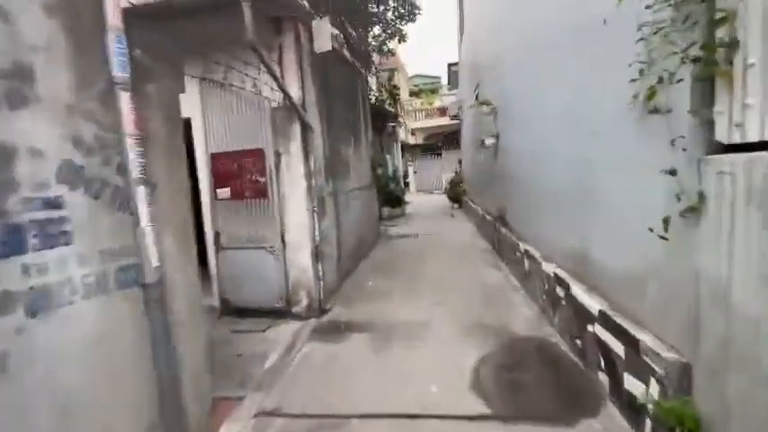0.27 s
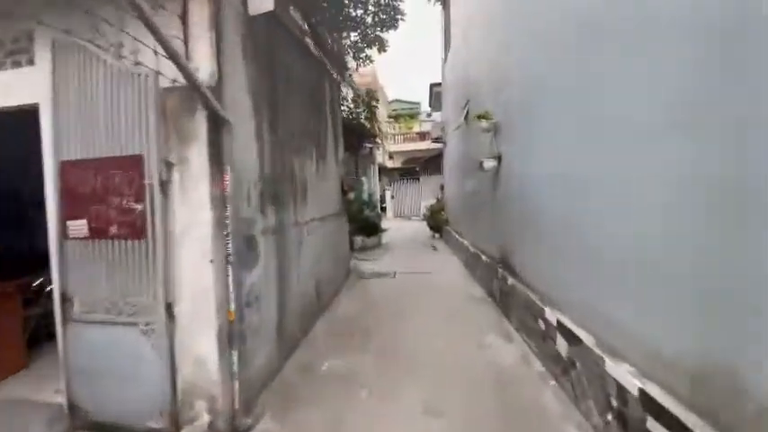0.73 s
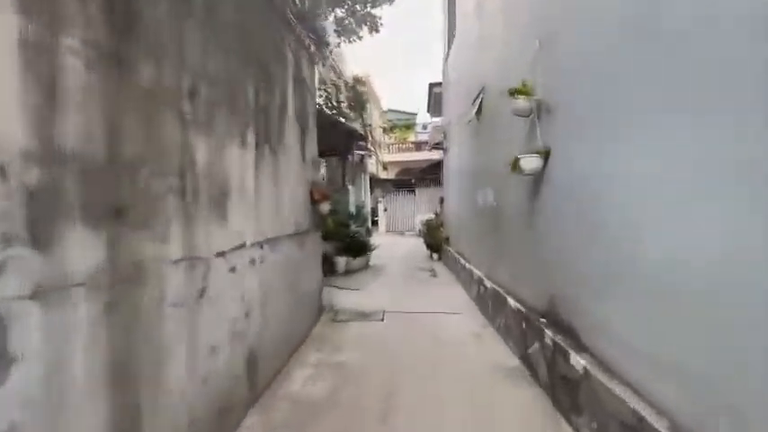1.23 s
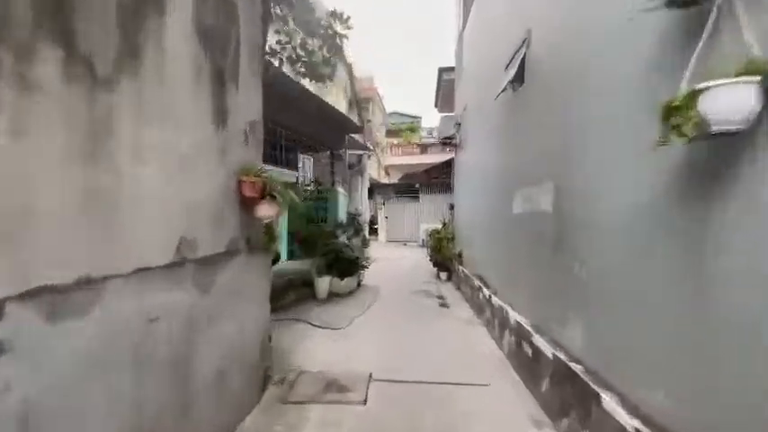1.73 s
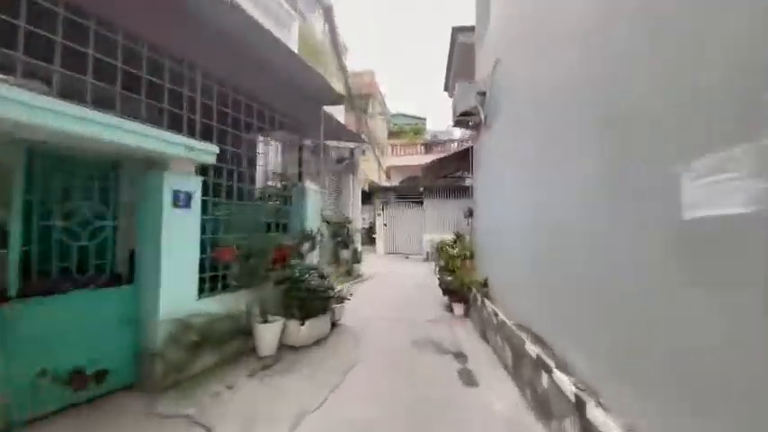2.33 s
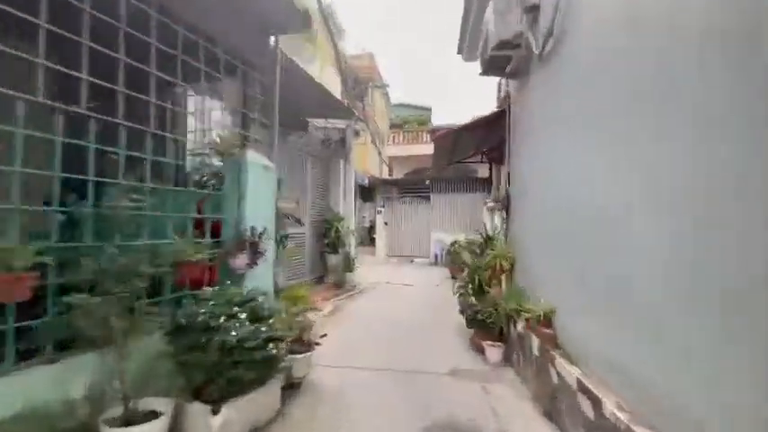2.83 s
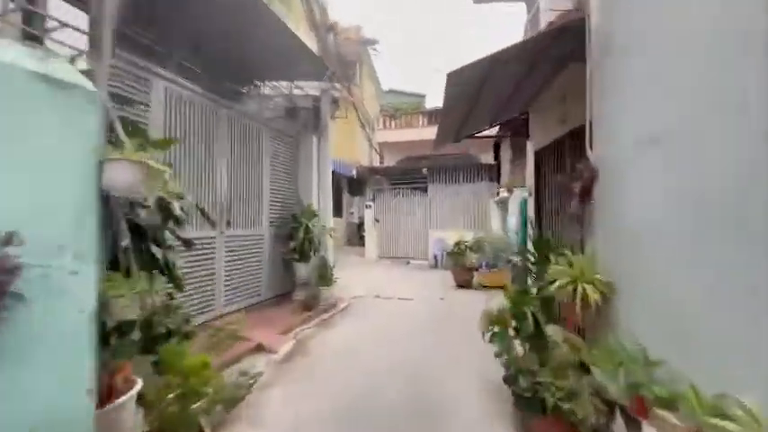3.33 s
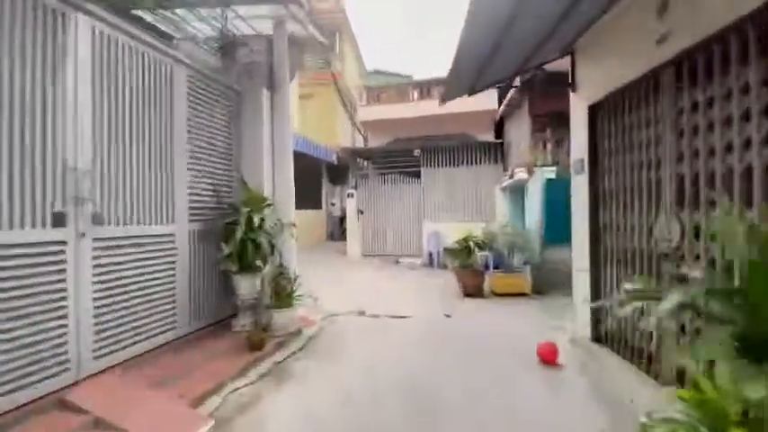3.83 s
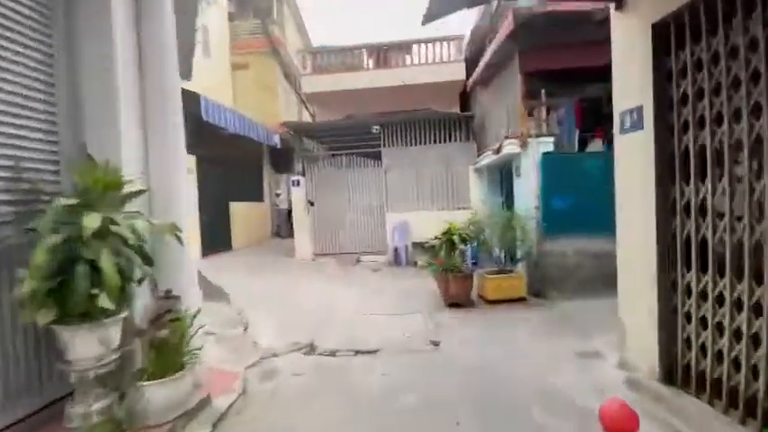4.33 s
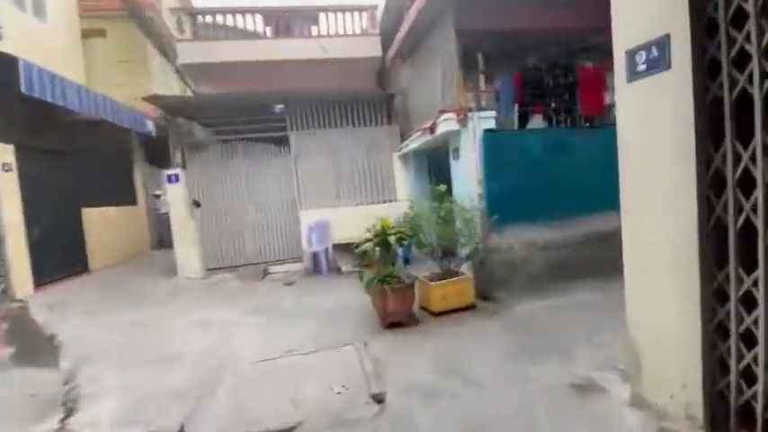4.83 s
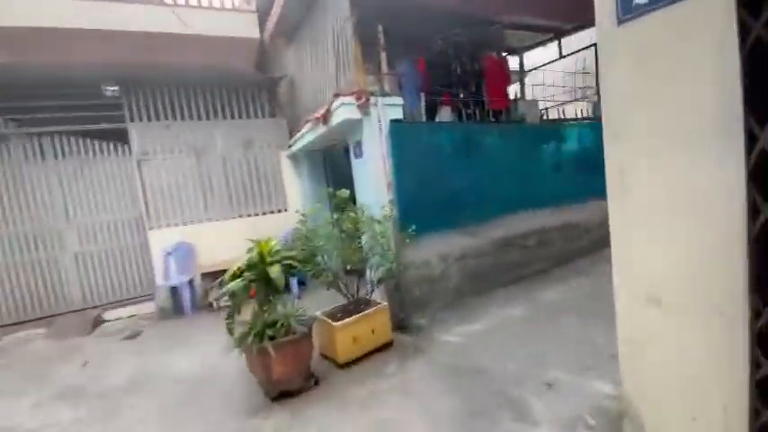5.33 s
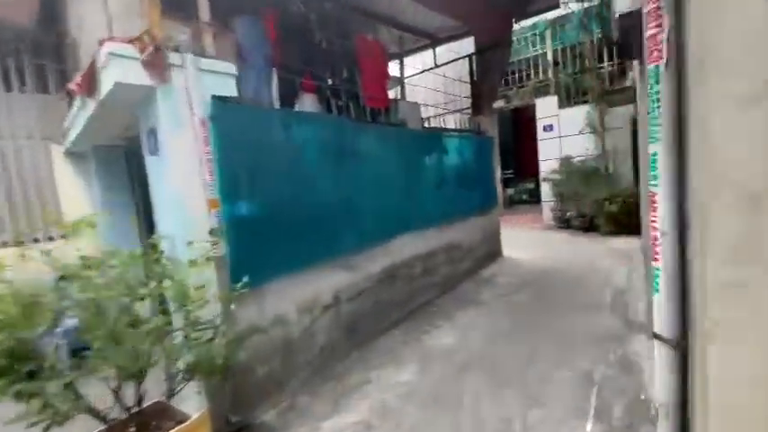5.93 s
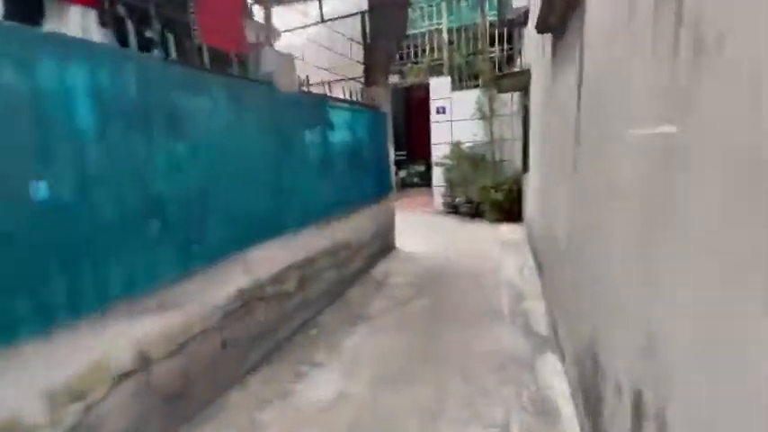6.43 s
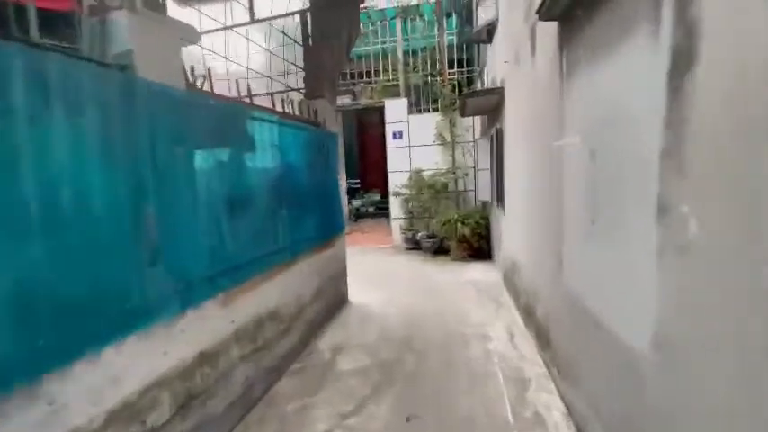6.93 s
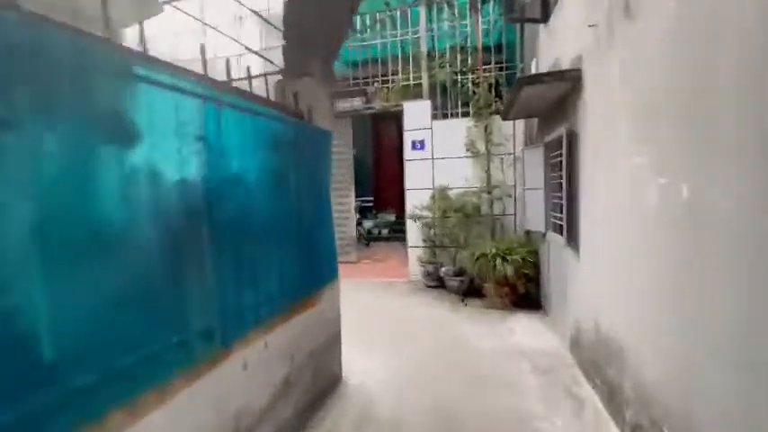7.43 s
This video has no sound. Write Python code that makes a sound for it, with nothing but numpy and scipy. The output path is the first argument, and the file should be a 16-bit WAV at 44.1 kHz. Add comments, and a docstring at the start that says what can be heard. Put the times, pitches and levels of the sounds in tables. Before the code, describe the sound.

A small motorbike engine putters steadily, drops to a slow throb and picks up again, over tyre hiss and light rattles.

```python
"""A small one-cylinder four-stroke motorbike cruises down a walled lane, heard by two microphones on the
rider. Exhaust puffs ring the pipe and silencer while engine and tyres hiss and the gears sing. Early on,
loose parts clink and a brake squeaks. After 2.3 s the bike slows to idle for a corner, where panels hum
and the brake squeaks again. From 5.3 s it revs up with more clinks and one hard knock, and near 7 s
the throttle shuts again."""
import sys
import numpy as np
from scipy import signal
from scipy.fft import rfft, irfft, next_fast_len
from scipy.io import wavfile
from scipy.ndimage import uniform_filter1d

SR = 44100
rng = np.random.default_rng(int(sys.argv[2]) if len(sys.argv) > 2 else 0)


def output_pcm(signal):
    """Save a mono or channel-first signal as 16-bit PCM at the path in sys.argv[1].

    Samples are clipped to [-1, 1] before scaling.
    """
    pcm = np.clip(np.atleast_2d(signal).T, -1, 1) * 32767
    wavfile.write(sys.argv[1], SR, np.round(pcm).astype(np.int16))


N = 338247
T = np.arange(N) / SR


def amp(db):
    """Turns decibels into a number to multiply by."""
    return 10 ** (np.asarray(db) / 20)


def evened(x, size=N):
    """Holds the average strength (rms) near 1, over a sliding window of size samples."""
    return x / np.sqrt(abs(uniform_filter1d(uniform_filter1d(x ** 2, size), size)) + 1e-20)


def at_frequency(table, hz):
    """Looks up a table by frequency, giving each octave equal room."""
    f, value = np.transpose(table)
    return np.interp(np.log(hz + 1), np.log(f + 1), value)


def curves(table, t=T):
    """Joins the rows of each column by straight lines in time."""
    times, *columns = np.transpose(table)
    return [np.interp(t, times, column) for column in columns]


def swell(middle, length):
    """A smooth rise and fall of height 1."""
    return np.cos(np.pi * np.clip((T - middle) / length, -.5, .5)) ** 2


def flutter(size):
    """A random wobble; a larger size makes it slower."""
    return evened(uniform_filter1d(rng.standard_normal(N), size))


def resonate(x, hz, width):
    """Makes x ring near hz: shifts that pitch down to zero, smooths twice and shifts back."""
    spin = np.exp(2j * np.pi * np.cumsum(hz * np.ones(len(x))) / SR)
    r = np.exp(-np.pi * width / SR)
    smooth = signal.lfilter([(1 - r) ** 2], [1, -2 * r, r * r], x / spin)
    return 2 * (spin * smooth).real


# How often the engine fires: [t/s, f/Hz]
FIRING_RATE = [(0.0, 30.79), (1.66, 30.96), (2.0, 30.98), (2.22, 30.3), (2.32, 29.4), (2.65, 21.64),
               (2.85, 17.95), (3.23, 14.72), (3.83, 13.38), (4.93, 13.08), (5.17, 12.5), (5.33, 13.54),
               (6.0, 28.91), (6.29, 32.32), (6.6, 34.14), (6.88, 34.19), (7.05, 31.94), (7.35, 23.08),
               (7.67, 17.98)]
def engine_cycles():
    """Counts cycles since the start; each is one firing and two turns of the crank."""
    return np.cumsum(curves(FIRING_RATE)[0]) / SR


def throttle(shut_hz_per_s=19.05, idle_hz=15, lag_s=0.044):
    """How far the throttle is shut (told by the falling speed) and how far the engine idles, both 0-1."""
    firing = curves(FIRING_RATE)[0]
    climb = uniform_filter1d(np.gradient(firing) * SR, size=5000)
    late_climb = np.interp(T - lag_s, T, climb)
    return np.clip([-late_climb / shut_hz_per_s, (idle_hz - firing) / 3], 0, 1)


# Spells at idle when strong and weak firings take turns: [middle t/s, length/s, depth/0-1]
LIMPS = [(3.6, 1.5, 0.3), (4.76, 0.44, 0.4)]
def puffs(uneven_db=3.0, lead_s=.0275, start_cycle=-0.1785):
    """Each firing lets out one puff of gas, with a fading swirl behind it."""
    shut, idle = throttle()
    puff_time = T + lead_s - .004 * idle - .008 * shut  # later at idle or with the throttle shut
    cycle = np.interp(puff_time, T, engine_cycles()) + start_cycle + 1
    count = cycle.astype(int)
    slowness = np.clip(20 / curves(FIRING_RATE)[0] - .3, 0, 2)  # slow running burns less evenly
    strength = amp(uneven_db * slowness * rng.standard_normal(count[-1] + 1)[count])
    strength *= 1 + sum(depth * swell(s, length) for s, length, depth in LIMPS) * (-1.) ** count
    swirl = .002 * rng.standard_normal(N) * np.exp(-(cycle % 1) / .4)
    return strength * np.diff(count, prepend=count[0]) + swirl


# Loudness along the ride: [t/s, then level/dB of clatter, boom, overtone, silencer rear]
RIDE_LEVELS = [(0.0, -30, -23, -30, -42), (0.25, -29, -21, -21.5, -27), (0.5, -29, -15.5, -25.5, -25.5),
               (0.77, -28.5, -19.5, -37, -21.5), (1.0, -30, -24.5, -29, -26.5),
               (1.18, -31, -29.5, -32, -27), (1.47, -30, -22.5, -26, -27), (1.7, -28.5, -21.5, -47, -18),
               (2.26, -29, -23.5, -24, -28), (2.66, -33.5, -46, -33, -60), (2.86, -36.5, -28, -39.5, -63),
               (3.9, -38, -28, -32.5, -42.5), (4.5, -38.5, -30.5, -33, -43.5),
               (4.95, -37.5, -31.5, -28, -53), (5.3, -37, -30, -29.5, -68), (5.62, -34.5, -32, -26.5, -55),
               (5.92, -31, -24, -23, -43), (6.25, -30.5, -21.5, -31.5, -31), (6.5, -30, -23, -31.5, -27.5),
               (6.8, -26, -20.5, -21, -38.5), (6.96, -27.5, -18, -22, -28), (7.06, -28, -23, -18.5, -26.5),
               (7.14, -28.5, -29, -23, -32), (7.28, -30.5, -22, -25, -53), (7.45, -33.5, -24, -28.5, -67),
               (7.67, -34, -29, -45, -58)]
# The exhaust's throb: [t/s, then level/dB of coasting boom, upper overtone, silencer front]
THROB_LEVELS = [(0, -28, -27.5, -26), (.3, -45, -26.5, -30.5), (.62, -42, -24, -36), (.87, -24.5, -26, -27),
                (1.18, -43, -29.5, -32.5), (1.55, -38, -28.5, -28.5), (1.92, -27, -26, -31.5),
                (2.22, -31, -29.5, -27), (2.34, -18.5, -24, -31.5), (2.54, -16.5, -29, -41),
                (2.71, -16, -28, -32.5), (2.8, -25.5, -24.5, -35.5), (2.93, -26.5, -31.5, -35.5),
                (3.03, -28.5, -34, -34), (3.16, -27.5, -32.5, -41.5), (3.3, -33, -53, -33),
                (3.69, -28.5, -59, -54), (3.84, -26, -40, -43), (4.2, -31, -47, -44),
                (4.53, -42, -48, -48.5), (5.32, -37, -49, -44.5), (5.6, -27.5, -33, -35),
                (5.85, -22.5, -30, -35), (5.95, -37, -33, -42), (6.22, -48, -29, -27.5),
                (6.4, -46, -27.5, -32), (6.56, -54, -31, -31), (6.9, -51, -21, -31), (7.0, -34, -27, -25),
                (7.09, -18, -22, -38), (7.24, -16, -27, -30.5), (7.48, -17.5, -28.5, -35.5),
                (7.67, -20.5, -28, -32.5)]
# The exhaust's growl: [t/s, level/dB]
GROWL_LEVEL = [(0, -26), (.25, -33), (.5, -39), (1.2, -43), (1.55, -40), (1.75, -32), (2.2, -41),
               (2.7, -50), (5.5, -52), (5.9, -43), (6.1, -36), (6.5, -35.5), (6.8, -37), (6.97, -29),
               (7.2, -52), (7.67, -57)]
def voice_levels(growl_flutter_db=2.5):
    """How loud the exhaust's seven ringing voices are, in dB; the growl is uneven."""
    _, boom, overtone, rear = curves(RIDE_LEVELS)
    coasting, upper, front = curves(THROB_LEVELS)
    growl = curves(GROWL_LEVEL)[0] + growl_flutter_db * flutter(1500)
    return boom, coasting, overtone, upper, front, rear, growl


# Pitches slide as the gas heats and cools: [t/s, coasting boom f/Hz, silencer rear f/Hz]
HEAT_SLIDE = [(0, 85, 348.6), (2.3, 87.6, 347), (2.48, 81.5, 345), (2.58, 91, 340), (2.75, 82, 330),
              (5.5, 89.5, 358), (6.8, 96, 342), (6.97, 107, 377), (7.12, 98.4, 351), (7.3, 95, 320),
              (7.67, 83, 320)]
def voice_pitches(lock_hz=19):
    """Each voice's pitch over its resting pitch; above lock_hz, boom and overtone follow the engine."""
    firing = curves(FIRING_RATE)[0]
    coasting_hz, rear_hz = curves(HEAT_SLIDE)
    rest_hz = [rings[0][0] for rings in PIPE_RINGS]
    locked = np.clip((firing - lock_hz) / 4, 0, 1)
    let_go = throttle()[0] * np.clip((32 - firing) / 2, 0, 1)  # a shut throttle frees the overtone
    boom = 1 + locked * (2 * firing / rest_hz[0] - 1)
    overtone = 1 + locked * (1 - let_go) * (4 * firing / rest_hz[2] - 1)
    return boom, coasting_hz / rest_hz[1], overtone, 1, 1, rear_hz / rest_hz[5], 1


# How pipe and silencer ring, one group of rows per voice, in the order of voice_levels():
# [f/Hz, width/Hz, relative level/dB, share of the puff that comes back/0-1]
PIPE_RINGS = [
    [(58.6, 25.6, 0, 1)],
    [(87.6, 34, 0, 0.028)],
    [(120.6, 50, 0, 1)],
    [(155.1, 31, 12.5, 0.051), (186.3, 30, 4, 0.15)],
    [(250.2, 58, -0.5, 0.14), (303.3, 21.4, -6, 0.4)],
    [(372, 44, 12, 0.027), (360, 330, 10.5, 0.083), (496, 36, -9, 0.19)],
    [(415, 88, 0, 0.05)],
]
# How long after the boom each voice sounds: [t/s]
VOICE_DELAYS = [0, 0, 0, .006, -.012, -.012, -.012]
def exhaust(round_trip_s=0.01642):
    """Each puff, and its echo from the end of the pipe, rings the pipe and the silencer."""
    gas = puffs()
    echo = np.roll(gas, round(round_trip_s * SR))
    signs = (1, -1, 1, -1, 1, -1, -1)  # whether a voice starts with a push or a pull
    voices = zip(PIPE_RINGS, voice_pitches(), voice_levels(), VOICE_DELAYS, signs)
    sound = 0
    for rings, pitch, level_db, delay, sign in voices:
        voice = sum(amp(db) * resonate(gas + share * echo, hz * pitch, width) / width
                    for hz, width, db, share in rings)
        voice = np.interp(T - delay, T, evened(voice, size=8000), right=0)
        end_fade = np.clip((T[-1] + delay - T) * 200, 0, 1)
        sound += sign * amp(level_db) * voice * end_fade
    return sound


# The tone of engine and tyre noise: [f/Hz, relative level/dB]
NOISE_TONE = [(20, -19), (45, -20), (75, -18), (120, -15.5), (200, -25), (280, -24.5), (380, -24.5),
              (610, -27), (1400, -26.5), (2200, -33), (3300, -34.5), (3700, -38.5), (7300, -44.5),
              (9900, -43), (11200, -51.5), (12800, -64)]
# Where panels and casing ring and lift that noise: [f/Hz, width/Hz, added level/dB]
CASING_RINGS = [(361, 175, 5), (506.5, 13, 4.5), (694, 49, 5), (1022, 62, 4), (1334, 6.7, 4),
                (1716, 700, 2.5), (2910, 300, 4), (5270, 1200, 3), (6270, 480, 5), (8770, 1570, 5)]
def clatter_tone(hz):
    """How strong the noise is at each frequency once the casing has shaped it."""
    lift_db = sum(db / (1 + (2 * (hz - f) / width) ** 2) for f, width, db in CASING_RINGS)
    tone = amp(at_frequency(NOISE_TONE, hz) + lift_db)
    return tone / np.sqrt(np.sum(tone[(hz > 500) & (hz < 2500)] ** 2))


# Boosts and cuts to the clatter: [t/s, bass level/dB, treble level/dB, top level/dB]
BAND_LEVELS = [(0, 2, 0, 1), (.8, -2, 0, -2.5), (1.5, 0, 0, -1), (2.3, 0.5, -1, -3), (3, 1, -0.5, 0),
               (4, 5, -2, -2), (4.5, -1, -1, 1), (5.3, -5, -2.5, -2), (5.5, 0, 1.5, 1), (5.75, 8.5, 1, 6),
               (6.1, 3.5, 0.5, 3), (6.5, 1, -1.5, 2), (6.9, -5, 0.5, 3), (7.2, -8, -1, 2),
               (7.67, 4, 0.5, 1)]
# The same for its rasp near 3 kHz: [t/s, level/dB]
RASP_LEVEL = [(0, 1), (2.3, 1), (3.5, 1.5), (4.5, -0.5), (5.5, -0.5), (6.0, -2.5), (6.5, -2), (7.1, 0.5),
              (7.67, 1)]
def clatter_bands(hz, t):
    """The low and high parts of the clatter grow and fade on their own, in dB."""
    bass_db, treble_db, top_db = curves(BAND_LEVELS, t)
    bass = np.clip(np.log2(400 / (hz + 1)) / 2, 0, 1) * bass_db
    treble = np.clip(np.log2((hz + 1) / 2200), 0, 1) * treble_db
    top = (hz > 10600) * top_db
    rasp = curves(RASP_LEVEL, t)[0] / (1 + ((hz - 3050) / 450) ** 4)
    return bass + treble + top + rasp


# How alike the clatter is left and right; the highest hiss is nearly the same on both sides:
# [f/Hz, likeness/0-1]
LIKENESS = [(60, 1), (300, 0.8), (600, 0.34), (1200, 0.37), (2500, 0.062), (5000, 0.14), (8000, 0.75),
            (12000, 1)]
def clatter(patchy_db=2.5, beat_depth=0.029, boost_db=3.5):
    """Valves, chain, fan and tyres make a noise that beats once per turn of the crank."""
    t = np.arange(N // 512 + 5) * 512 / SR
    hz = np.fft.rfftfreq(2048, 1 / SR)[:, None]
    draws = rng.standard_normal((len(t), len(hz), 5)).T
    right, separate = draws[0] + 1j * draws[1], draws[2] + 1j * draws[3]
    patches = uniform_filter1d(uniform_filter1d(draws[4], 5, 0), 14, 1)  # rings come and go as walls pass
    level_db = curves(RIDE_LEVELS, t)[0] + boost_db + clatter_bands(hz, t)
    level_db += patchy_db * patches / patches.std()
    alike = np.clip(at_frequency(LIKENESS, hz), 0, 1)
    left = alike * right + np.sqrt(1 - alike ** 2) * separate
    spectrum = np.array([left, right]) * microphone_gains(hz) * clatter_tone(hz) * amp(level_db)
    noise = signal.istft(spectrum, nperseg=2048, noverlap=1536)[1][:, :N]
    return noise * (1 + beat_depth * np.cos(4 * np.pi * engine_cycles()))


# Tones of the meshing teeth: [multiple of the firing rate, relative level/dB]
GEAR_TONES = [(35.8, 7), (50, -3), (100.8, -13)]
# Moments when the gears sing louder: [middle t/s, length/s, level/dB]
GEAR_SWELLS = [(0.17, 0.18, -48), (0.426, 0.055, -29), (0.674, 0.53, -41), (1.333, 0.44, -37),
               (1.9, 0.41, -37)]
def gear_whine(steady_db=-38.5, end_s=2.38, flutter_db=1.5):
    """Gear teeth sing under load, wavering a little, until the throttle first shuts."""
    drift = np.cumsum(rng.standard_normal(N)) * 0.00063
    phase = 2 * np.pi * engine_cycles() + drift
    level = amp(steady_db) * np.clip((end_s - T) / 0.083, 0, 1)
    level += sum(amp(db) * swell(s, length) for s, length, db in GEAR_SWELLS)
    level *= amp(flutter_db * flutter(900))
    return level * sum(amp(db) * np.sin(multiple * phase) for multiple, db in GEAR_TONES)


def burst(start_s, db, hz, width, rise_s, fade_s):
    """A band of noise that rises quickly and dies away, losing 60 dB in fade_s."""
    t = T[:SR * 3 // 4]
    ring = resonate(rng.standard_normal(len(t)), hz, width)
    level = amp(db - 60 * t / fade_s) * np.minimum(t / rise_s, 1)
    return np.r_[np.zeros(round(start_s * SR)), level * ring / ring.std(), np.zeros(N)][:N]


# Rings of loose parts: [t/s, level/dB, f/Hz, width/Hz, rise/s, fade/s]
LOOSE_PARTS = [(.53, -18.5, 9100, 3704, 0.063, 0.23), (1.725, -33, 2830, 833.3, 0.0033, 0.41),
               (5.358, -28, 1080, 450, .012, 0.27), (5.42, -28, 8300, 7400, 0.0049, 0.27),
               (5.42, -36.5, 2390, 2500, .02, .7), (5.425, -38.5, 6600, 90, .004, 0.52),
               (5.419, -32.5, 5840, 300, .005, 0.28), (5.4, -32, 8800, 250, 0.021, 0.36),
               (5.43, -41, 5170, 90, .004, 0.35), (6.145, -29, 9350, 2500, .005, 0.11),
               (6.2454, -21.5, 3200, 4860, 0.00046, 0.034), (6.251, -23, 5500, 2160, 0.0026, 0.044)]
def clinks():
    """Loose parts strike and ring briefly."""
    return sum(burst(*row) for row in LOOSE_PARTS)


# Brake squeaks: [t/s, level/dB, f/Hz, width/Hz, rise/s, fade/s, relative tail level/dB, tail width/Hz]
BRAKE_SLIPS = [(0.6, -16.5, 6440, 100, 0.062, 0.42, -7, 260), (3.96, -26, 6420, 70, 0.021, 0.55, -10, 100)]
def brake_squeaks():
    """A brake shoe slips in a fluttering high tone with a faint octave above, and rings on."""
    tone = 0
    for s, db, hz, width, rise, fade, tail_db, tail_width in BRAKE_SLIPS:
        tone += burst(s, db, hz, width, rise, fade)
        tone += burst(s, db + tail_db, hz - 60, tail_width, 2 * rise, 1.9 * fade)
    octave = resonate(tone ** 2 / abs(tone).max(), hz=12900, width=500)  # squaring doubles the pitch
    return tone + amp(-9) * octave


# Humming panels: [f/Hz, width/Hz, level/dB when the engine pulls steadily between close walls]
PANELS = [(705, 27, -45), (832, 11, -49), (993, 122, -35), (1360, 370, -43)]
# Swells of the hum, each played by the panel near its pitch: [middle t/s, length/s, f/Hz, level/dB]
PANEL_SWELLS = [(3.632, 0.65, 700, -42), (3.82, 0.18, 850, -36), (4.656, 0.24, 700, -41),
                (5.018, 0.12, 995, -40), (5.14, 1, 1440, -42.5), (5.902, .25, 995, -42),
                (6.147, 0.24, 995, -33), (6.293, 0.24, 995, -34), (6.565, 0.28, 995, -37),
                (6.75, 0.36, 700, -38), (6.933, 0.2, 1440, -30), (6.975, 0.12, 995, -26),
                (7.175, 0.2, 700, -34), (7.287, 1, 1440, -38), (7.525, 0.41, 700, -37.5)]
def panel_hum(close_walls_s=5.56, steady_pull_db=-28):
    """Engine shake rings a few panels: in swells at first, then all the time once the walls are close."""
    pull = amp(curves(RIDE_LEVELS)[0] - steady_pull_db)
    steady = np.clip((T - close_walls_s) / 0.36, 0, 1) * pull
    sound = 0
    for hz, width, db in PANELS:
        swells = sum(amp(swell_db) * swell(s, length) for s, length, swell_hz, swell_db in PANEL_SWELLS
                     if abs(np.log(swell_hz / hz)) < np.log(10 / 9))
        ring = evened(resonate(rng.standard_normal(N), hz, width))
        sound += (amp(db) * steady + swells) * ring
    return sound


# The notes of the bike's frame: [f/Hz, width/Hz, level/dB]
FRAME_RINGS = [(330, 40, -18), (650, 200, -18), (1250, 200, -12), (1900, 300, -17), (2650, 200, -15),
               (3900, 500, -24), (5300, 400, -26)]
def frame_knock(start_s=6.245):
    """A hard tap rings the frame; the wider a note, the sooner it dies."""
    t = np.maximum(T - start_s, 0)
    return sum(amp(db) * np.exp(-np.pi * width * t) * np.sin(2 * np.pi * hz * t)
               for hz, width, db in FRAME_RINGS)


# How much louder the left microphone is than the right: [f/Hz, level/dB]
LEFT_LOUDER = [(60, 1), (130, -3.5), (270, -1), (590, -8), (1250, -5), (2680, -5.0), (5720, -1.5),
               (12200, 0.5)]
# How far ahead the wave is on the left: [f/Hz, phase/radians]
LEFT_AHEAD = [(30, 0), (125, 0.14), (340, 0.3), (690, -3), (1810, -4.5), (3270, -7), (6120, -16),
              (7240, -21), (8270, -19.5), (10200, -21.5), (11000, -24), (12400, -23)]
def microphone_gains(hz):
    """The left and right microphones hear one source, each with its own level and delay."""
    left = amp(at_frequency(LEFT_LOUDER, hz) / 2) * np.exp(.5j * at_frequency(LEFT_AHEAD, hz))
    return np.array([left, 1 / left])


def passing_walls(x):
    """Passing walls and doorways swing the timing of the boom between left and right."""
    swing = sum(np.sin(2 * np.pi * (hz * T + rng.random())) for hz in (.5, .9, 1.7, 2.9))
    size = next_fast_len(N)
    shifted = irfft(1j * rfft(x, size), size)[:N]  # every wave moved by a quarter of its length
    return swing * shifted * np.array([[1], [-1]])


def lane_echoes(x, fade_s, echoes_per_s=2000):
    """Sound bounces between the walls; each microphone gets its own random, fading echoes."""
    t = T[:SR // 2]
    echoes = rng.choice([-1., 1.], (2, len(t))) * (rng.random((2, len(t))) < echoes_per_s / SR)
    echoes *= amp(-60 * t / fade_s) * (t > .004)
    return signal.fftconvolve(x[None], echoes / np.linalg.norm(echoes[0]), axes=1)[:, :N]


def scene():
    """The bike as the two microphones hear it, with the walls of the lane."""
    boom, parts = exhaust(), brake_squeaks() + clinks()
    hum, whine, knock = panel_hum(), gear_whine(), frame_knock()
    gains = microphone_gains(np.fft.rfftfreq(N, 1 / SR))
    direct = irfft(rfft(boom + whine + hum + parts) * gains, N)
    echoes = amp(-11.5) * passing_walls(boom)
    echoes += lane_echoes(amp(-9) * whine + amp(-19) * boom + amp(-1.5) * hum, fade_s=0.24)
    echoes += amp(-2.5) * lane_echoes(parts + knock, fade_s=0.13)
    return direct + knock + echoes + clatter()


def record(dry):
    """The sound loses its deepest bass, a narrow treble band near 10.6 kHz and the very top."""
    bass_cut = signal.butter(3, 32, "high", fs=SR, output="sos")
    treble_dip = signal.butter(3, [10250, 11000], "stop", fs=SR, output="sos")
    top_cut = signal.firwin(511, 12840, window=("kaiser", 9), fs=SR)
    filtered = signal.sosfilt(treble_dip, signal.sosfilt(bass_cut, dry))
    return signal.oaconvolve(filtered, top_cut[None], "same")


dry = scene()
out = record(dry)
output_pcm(out)
```